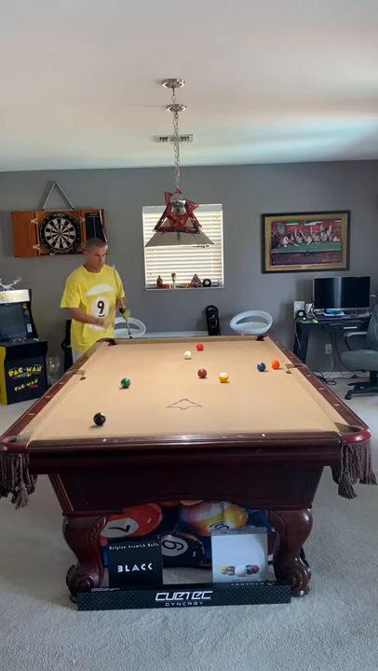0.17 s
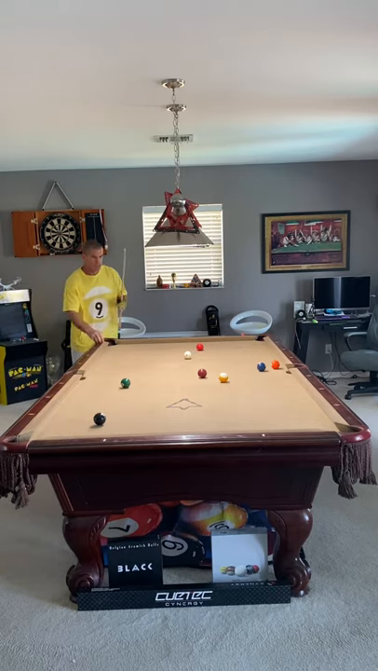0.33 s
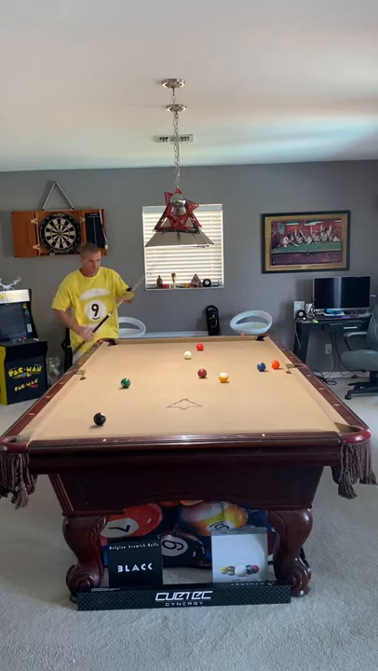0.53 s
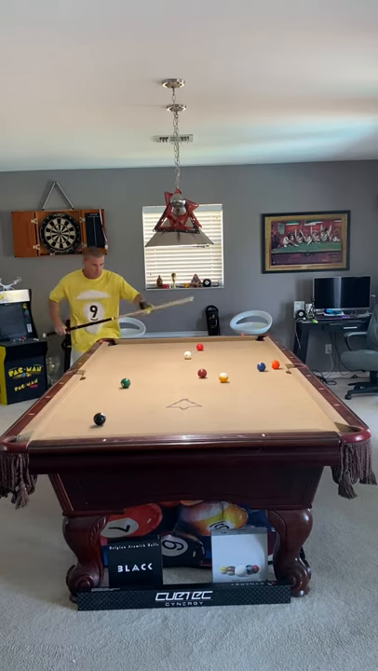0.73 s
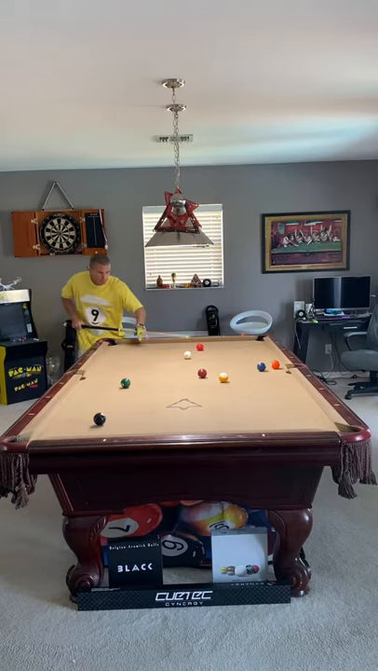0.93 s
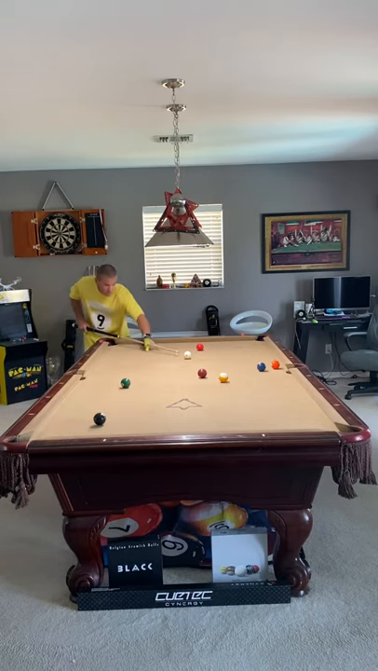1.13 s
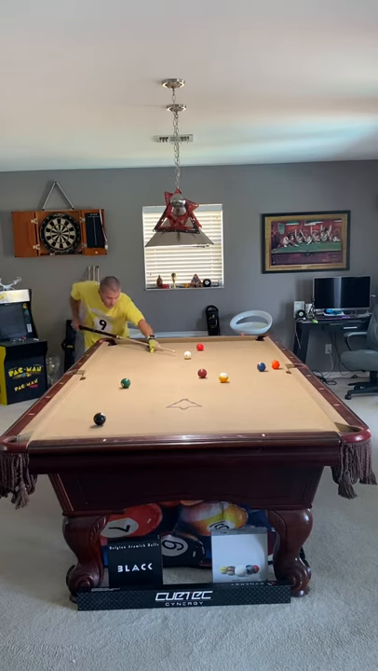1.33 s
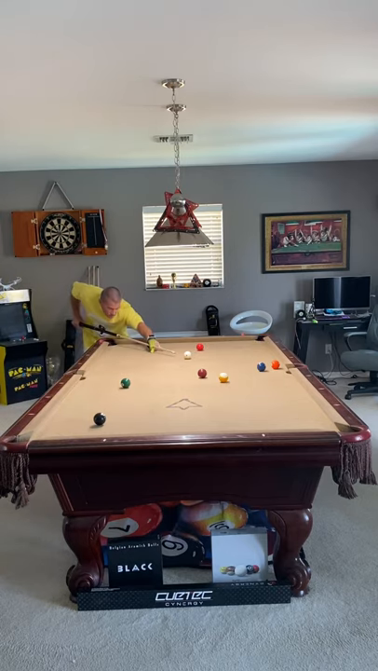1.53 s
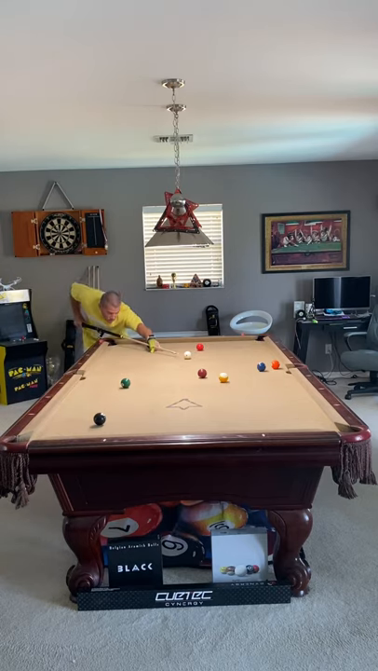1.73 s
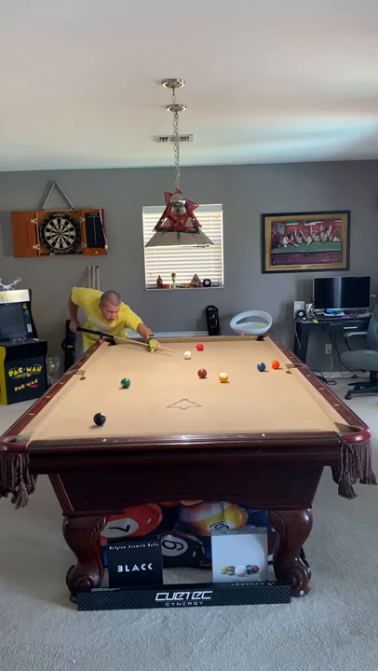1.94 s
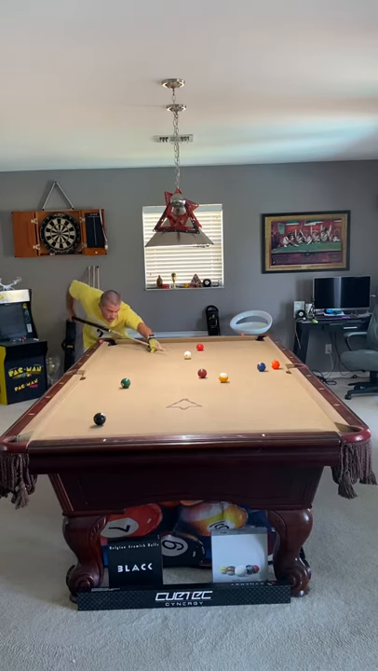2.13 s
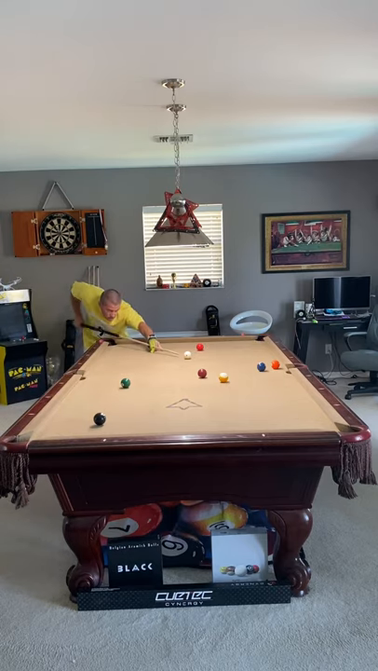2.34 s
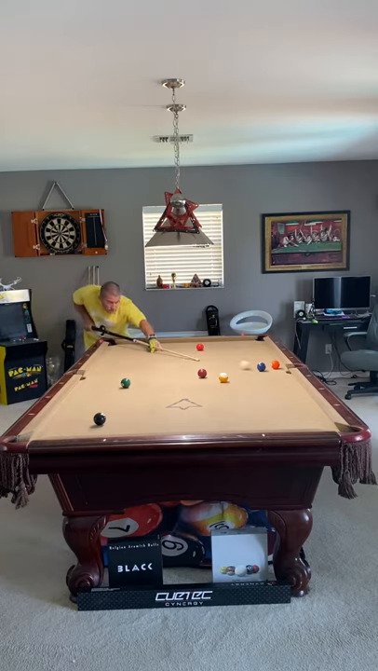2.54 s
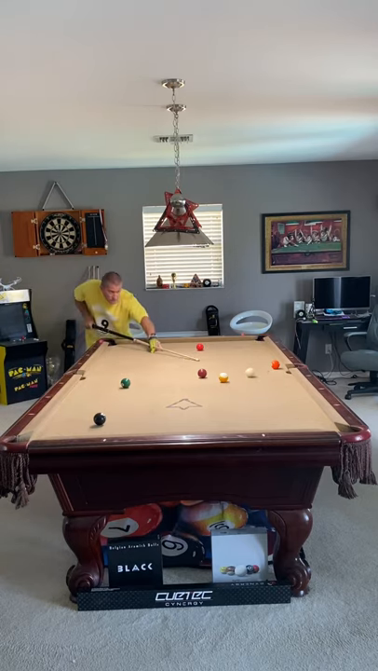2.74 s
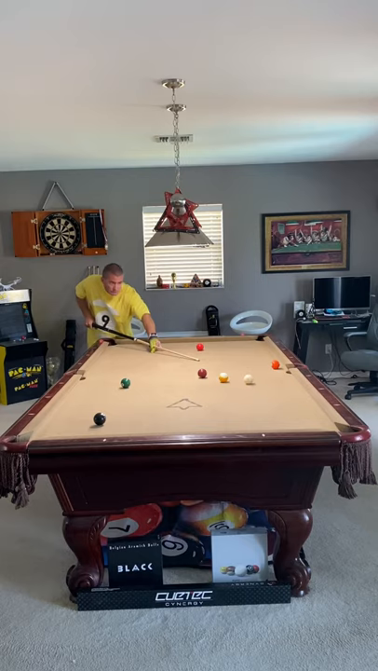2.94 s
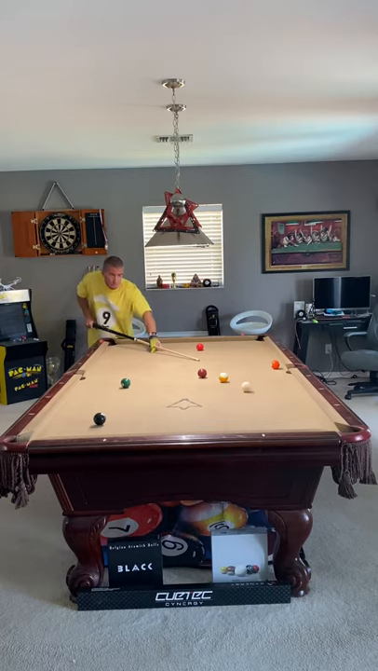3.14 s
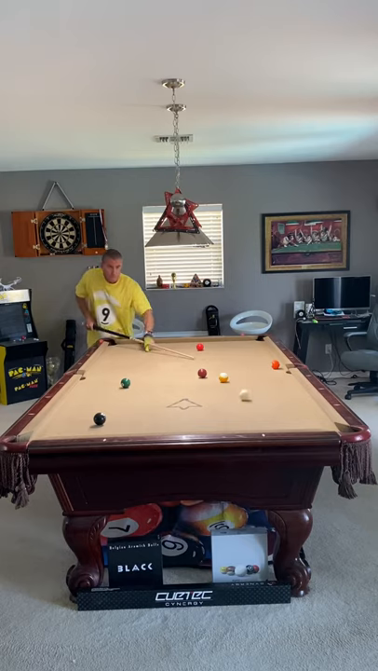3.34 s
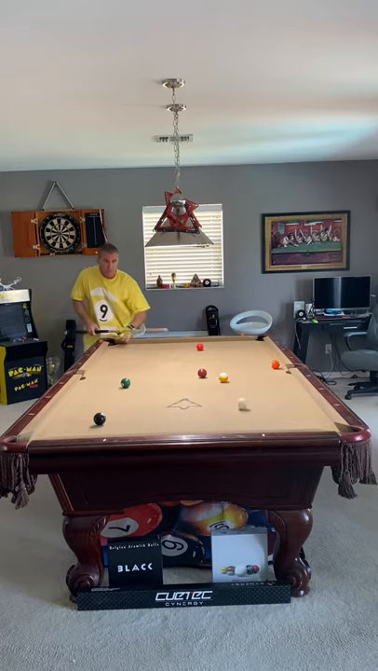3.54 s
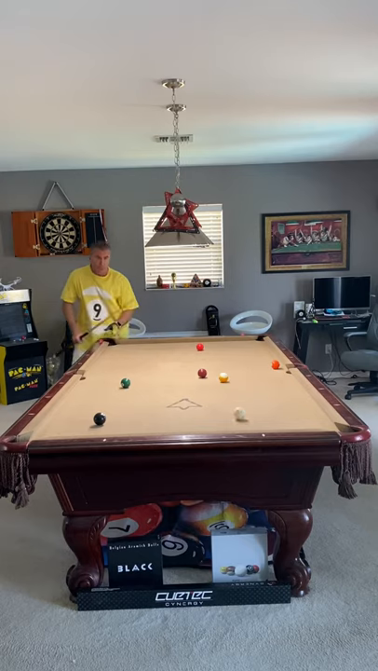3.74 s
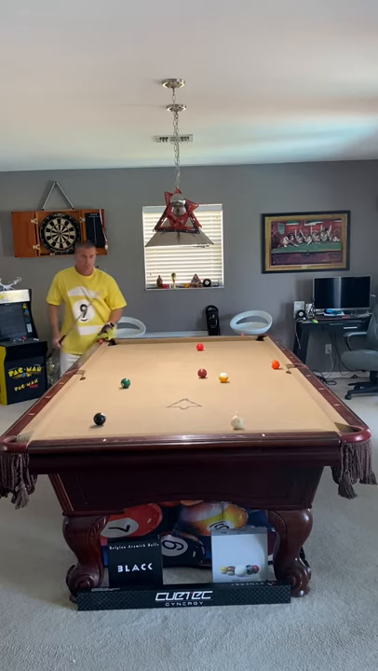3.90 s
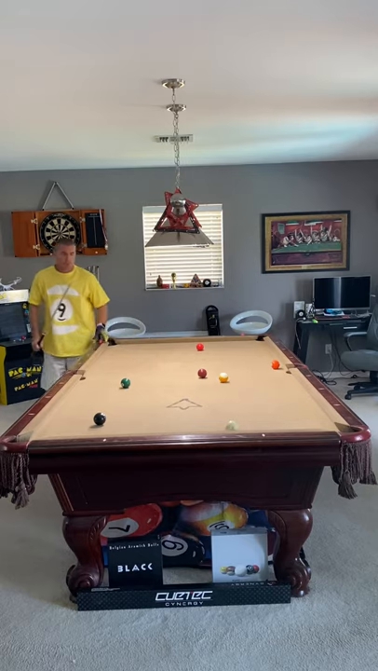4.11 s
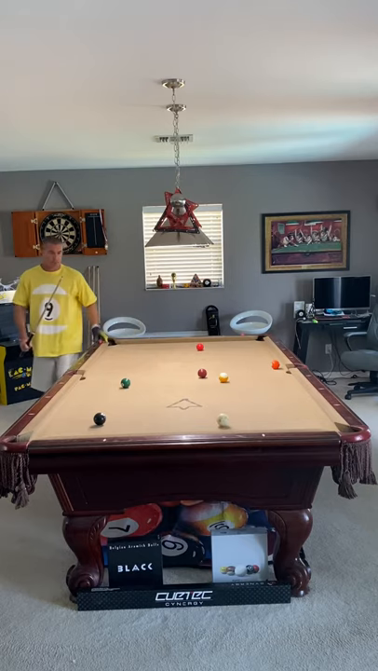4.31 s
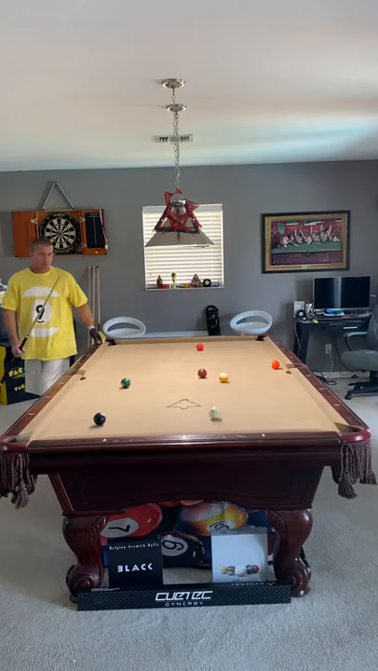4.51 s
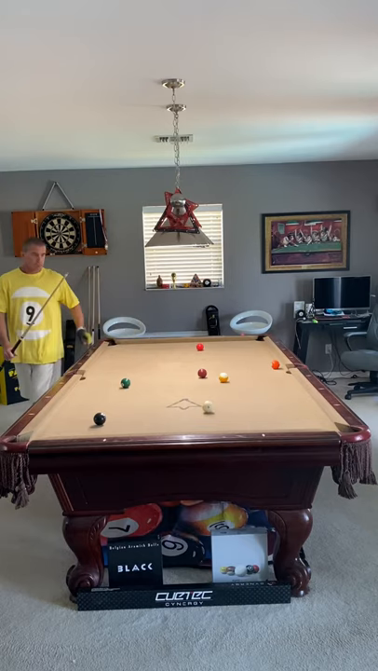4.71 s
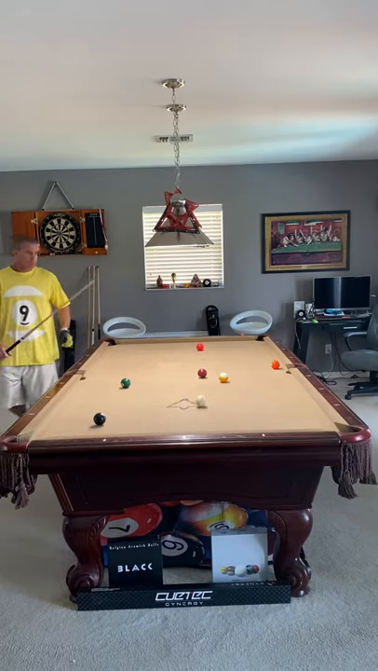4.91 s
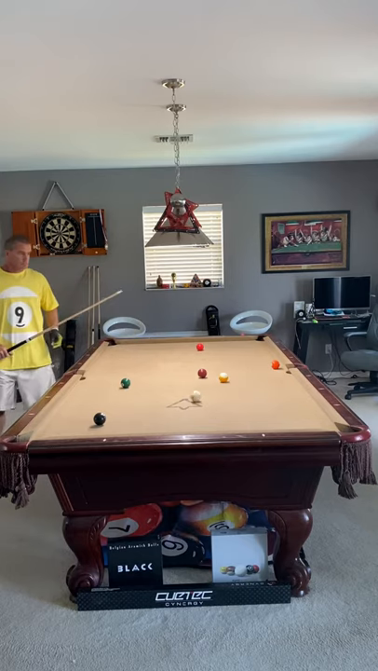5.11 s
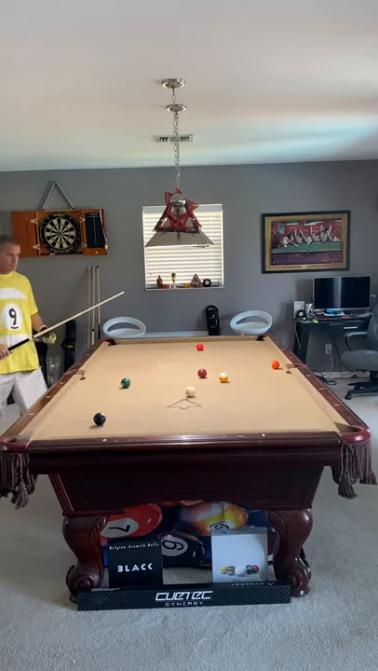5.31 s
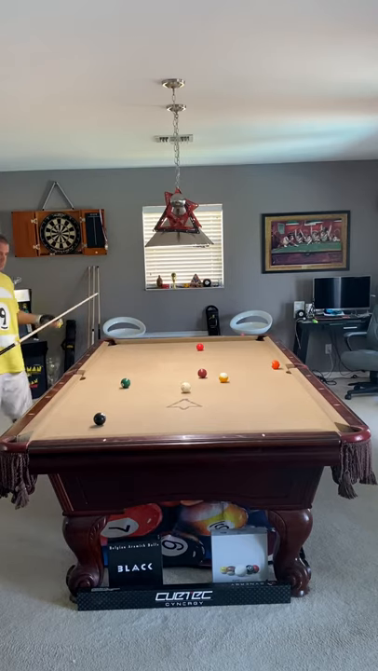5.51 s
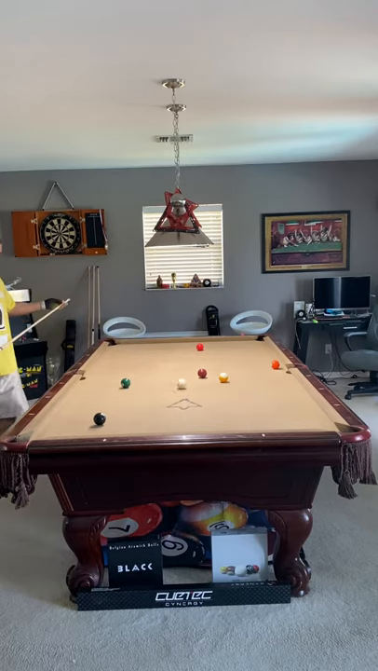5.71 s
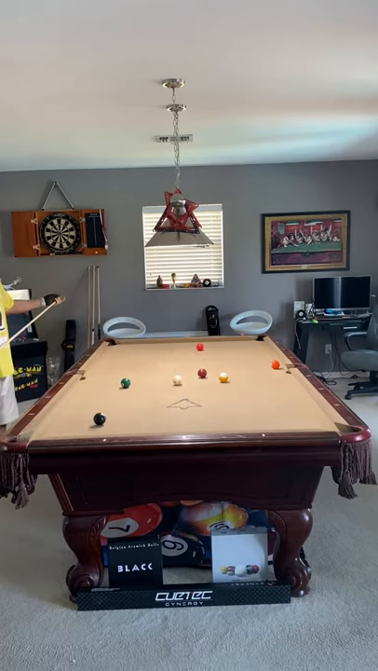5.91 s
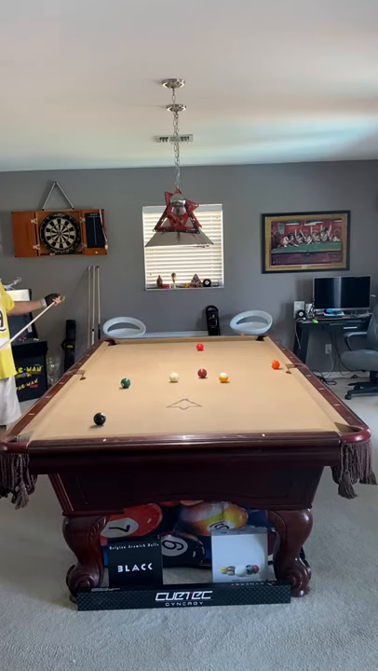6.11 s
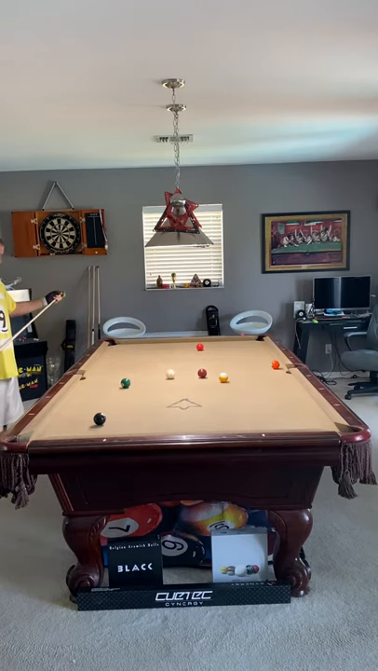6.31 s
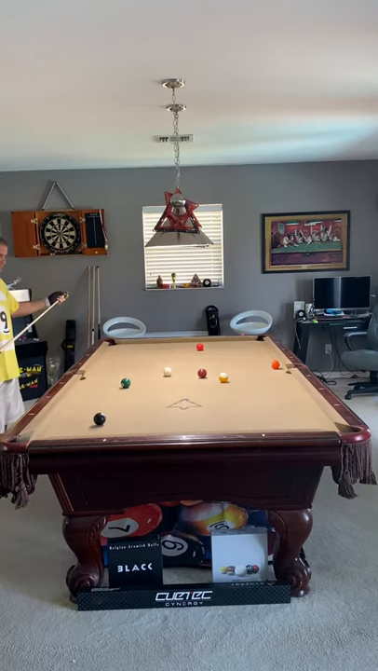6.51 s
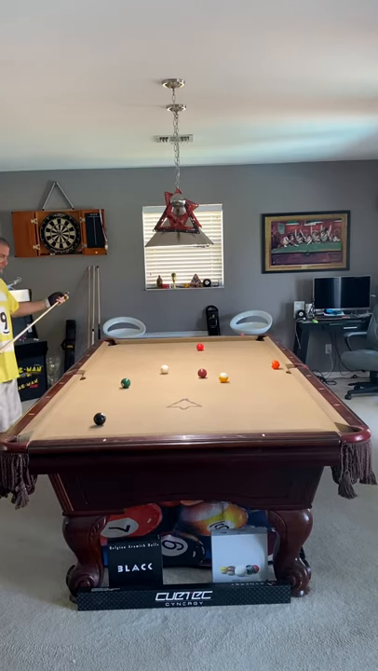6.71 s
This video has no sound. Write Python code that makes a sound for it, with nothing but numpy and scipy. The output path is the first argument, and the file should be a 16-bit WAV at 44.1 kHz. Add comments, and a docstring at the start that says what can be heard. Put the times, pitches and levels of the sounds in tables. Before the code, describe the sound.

A cue strikes a pool ball, balls clack and rattle into a pocket, then chalk faintly scrapes the tip in a quiet room.

```python
"""First comes a soft brush of clothes and a tap on the wooden rail of a pool table. Then the cue knocks
the white ball; balls clack, thump the cushions and rattle into a pocket. Last, chalk scrapes the cue tip.
Hard balls give very short clicks, while cue, rail and table ring briefly when hit. Rubbing cloth and
shifting weight make swells of noise. The carpeted room answers each blow with echoes and a half-second
tail, over a low house rumble."""
import sys
import numpy as np
from scipy import signal
from scipy.fft import rfft, irfft
from scipy.io import wavfile
from scipy.ndimage import uniform_filter1d

SR = 44100
rng = np.random.default_rng(int(sys.argv[2]) if len(sys.argv) > 2 else 0)


def generate_wav(sig):
    """Save sig (samples, or channels by samples) to the path in sys.argv[1] as 16-bit PCM at SR."""
    pcm = np.round(np.clip(np.atleast_2d(sig).T, -1, 1) * 32767).astype(np.int16)
    wavfile.write(sys.argv[1], SR, pcm)


N = 297675


# Ball on ball, small hard ticks, and a duller echo of the first clack just after it. "Edge" is the sharp snap;
# "send" is what goes out into the room. # t/s, level/dB, f/Hz, rise of the send/cycles, edge/dB, send/dB, left
# minus right/dB
BALL_CLACKS = [(2.5635, -7.5, 2350, 0.95, -18.5, -7.5, -0.5), (2.5637, -24, 4000, 1.5, -30, -6, 0),
               (2.5835, -25, 1250, 1.5, -40, -12, 0), (2.872, -18.5, 1900, 0.72, -28, -8.5, -3),
               (2.9988, -27, 1850, 0.6, -3.5, 1, 6), (3.0045, -26, 2060, 1.6, -8, -11, 0),
               (3.004, -35.5, 4530, 3.2, -31, -5.5, 10), (5.6189, -54, 4500, 1.5, -20, -8, 3),
               (5.7275, -36, 3500, 2.2, -18, -21, 2), (6.2672, -37, 2750, 0.8, -25, -13, 0.5)]
def ball_clacks():
    """Hard balls barely ring: each contact is a quick wiggle of air pressure with a sharp edge."""
    direct, send = np.zeros((2, N)), np.zeros(N)
    t = np.arange(1500) / SR
    for s, db, hz, cycles, edge_db, send_db, pan_db in BALL_CLACKS:
        edge = undb(edge_db) * crack(len(t), fade_s=0.0033, top_hz=2500)
        straight = wiggle(t, hz, rise_s=1.5 * cycles / hz, steepness=3)
        sideways = wiggle(t, 0.92 * hz, rise_s=cycles / hz, steepness=4)  # lower toward the walls
        pan = undb(np.array([[pan_db], [-pan_db]]) / 2)
        add(direct, s, undb(db) * (straight + edge) * pan)
        add(send, s, undb(db + send_db) * (sideways + edge))
    return direct, send


def wiggle(t, hz, rise_s, steepness):
    """A tiny burst of tone that peaks at rise_s and dies away."""
    age = t / rise_s
    return np.sin(2 * np.pi * hz * t) * (age * np.exp(1 - age)) ** steepness


def crack(size, fade_s, top_hz, order=1):
    """The sharp edge of a contact: one snap and a little grit after it."""
    burst = .35 * rng.standard_normal(size + 1) * np.exp(-np.arange(size + 1) / SR / fade_s)
    burst[0] = 3  # the snap
    return signal.lfilter(*signal.butter(order, top_hz, fs=SR), np.diff(burst, prepend=0)[:size])


# Knocks of the cue; more tilt favours the high notes.
# t/s, level/dB, contact time/ms, edge/dB, send/dB, tilt/(dB per octave)
CUE_HITS = [(2.3595, -24, 0.24, -9, -4, -0.5), (2.370, -23.5, 0.082, -8.5, -16.5, 3),
            (2.380, -22.5, 0.47, -11, -15, -4), (2.391, -27, 0.45, -19, -15, -1),
            (2.411, -31, 0.33, -20.5, -12, -5), (2.456, -34.5, 0.15, -19.5, -14, 1)]
# The notes a cue rings with: f/Hz, level/dB, time to fade by 60 dB/s
CUE_NOTES = [(201.2, -5.5, 0.019), (288, -8, 0.015), (390, -3.5, 0.015), (460.7, 1, 0.014),
             (650, -4.5, 0.018), (820, -3, 0.015), (973.4, -5.5, 0.017), (1360, -6, .012),
             (1626, -13.5, 0.05), (2028, -12.5, 0.015), (2350, -12, 0.03006), (2760, -15, 0.022),
             (3900, -13, 0.0062)]
def cue_strike():
    """The cue hits the white ball and rings in a quick run of knocks."""
    return blows(CUE_HITS, CUE_NOTES)


# Hand and hip lean on the table, then balls hit cushions and pocket. Columns as in CUE_HITS.
TABLE_HITS = [(.785, -52, 3.7, -58, -14.5, -1.5), (1.326, -52.5, 3.6, -60, -10.5, -3),
              (2.612, -31.5, 1.76, -40, -5.5, -0.5), (2.667, -23, 0.35, -26, -4, 3.5),
              (2.677, -29, 0.79, -40, -7.5, 1.5), (2.687, -22, 0.42, -31, -27.5, -2),
              (2.696, -33, 1.3, -37.5, -27, 1), (2.715, -32.5, 1.04, -37, -16, -1),
              (2.730, -28, 0.32, -23, -5, 7), (2.792, -30, 0.7, -39.5, -21, 4.5),
              (2.801, -26.5, 0.27, -38, -10, 11), (2.855, -35, 5.7, -36.5, -16.5, -9.5),
              (4.052, -49, 0.36, -24, -4, -3), (4.068, -46, 3.3, -48, -1, 1),
              (4.085, -32, 0.47, -35, -9.5, 1), (4.108, -31.5, 1.2, -39, -21, 1.5),
              (4.123, -40.5, 0.52, -41, -10, -1), (4.136, -33, 2, -40, -18.5, 0.5)]
# The table's notes: f/Hz, level/dB, time to fade by 60 dB/s
TABLE_NOTES = [(105, -9, 0.11), (146.4, -4.5, 0.13), (253.4, -13.5, 0.11), (352, 6.5, 0.034),
               (450, 13, 0.0044), (604, 6.5, 0.036), (724, 14, 0.0055), (895, 7, 0.011), (1170, 2, 0.0034)]
def table_thumps():
    """Mostly softer, longer pushes wake the low notes of the table."""
    return blows(TABLE_HITS, TABLE_NOTES)


# Something small is set down on the rail. Columns as in CUE_HITS.
RAIL_HITS = [(.281, -42.5, 0.18, -28, 2, 0), (.2885, -32, 0.094, -13.5, -11, 0),
             (.2965, -34.5, 0.15, -23, -12.5, -0.5), (.303, -32.5, 0.12, -32, -7.5, -0.5),
             (.307, -30.5, 0.15, -23, -18.5, -0.57)]
# The rail's notes: f/Hz, level/dB, time to fade by 60 dB/s
RAIL_NOTES = [(232, -3, 0.019), (360, -0.5, 0.051), (513, -0.5, 0.018), (608, -1.5, 0.029),
              (786, -1.5, 0.042), (1138, 0.5, 0.025), (1566, -5.5, 0.029), (1880, -4.5, 0.012),
              (2436, -3, 0.012), (3740, -0.5, 0.0014)]
def rail_tap():
    """A few light contacts ring the wooden rail, so close together that they make one tap."""
    return blows(RAIL_HITS, RAIL_NOTES)


def blows(hits, notes):
    """A push rings an object's own notes, a little differently each time; a longer push is duller."""
    direct, send = np.zeros(N), np.zeros(N)
    t = np.arange(SR // 4) / SR
    for s, db, contact_ms, edge_db, send_db, tilt_db in hits:
        scatter_db = 1.5 * rng.standard_normal(len(notes))
        detune = rng.normal(1, .008, len(notes))
        ring = 0
        for k, (hz, note_db, fade_s) in enumerate(notes):
            gain = (-1) ** k * undb(note_db + scatter_db[k] + tilt_db * np.log2(hz))
            ring += gain * np.sin(2 * np.pi * hz * detune[k] * t) * fade(t, fade_s)
        push = np.sin(np.pi * np.clip(t[:256] / (contact_ms / 1000), 0, 1))
        knock = np.convolve(ring, push / push.sum())[:len(t)]
        edge = undb(edge_db) * crack(len(t), fade_s=0.019, top_hz=4330, order=2)
        sound = undb(db) * (knock / np.abs(knock).max() + edge)
        add(direct, s, sound)
        add(send, s, sound * undb(send_db))
    return direct, send


# Where the cue's parts and the chalk cube ring (the collar holds the tip): f/Hz, width/Hz, level/dB
GRIP_BANDS = [(579, 72, 2), (764, 84, 3)]
SHAFT_BANDS = [(1260, 48, -10), (1413, 110, -3.5), (1520, 46, -3), (1876, 46, -2.5), (1550, 940, -3.5)]
TIP_BANDS = [(2518, 81, 1.5), (2700, 75, 0.5), (2310, 1240, -8)]
CUBE_BANDS = [(3140, 420, -3), (3510, 230, 1.5), (3970, 330, -3)]
COLLAR_BANDS = [(4800, 1300, 0), (5070, 3000, -9.5), (6150, 1670, -6.5)]
# Twists of the chalk: full at t/s, rise/s, hold/s, level/dB of grip, shaft, tip, cube, collar, dust
CHALK_TWISTS = [(5.62, 0.0029, 0.035, -64.5, -58.5, -66, -71, -65.5, -81),
                (5.67, 0.042, .01, -80, -75, -80, -66, -66, -93),
                (5.695, 0.015, .005, -78, -60, -66, -75, -64, -93),
                (5.745, 0.01, 0.0072, -80, -66, -55.5, -57, -60.5, -83),
                (5.785, 0.017, 0.014, -72, -67, -66, -60, -54, -73.5),
                (5.855, .01, 0.012, -78, -67.5, -71, -75, -79, -86),
                (5.9, 0.095, 0.28, -71.5, -68, -74, -80, -75.5, -106),
                (6.16, 0.033, 0.0069, -85, -71, -77, -71, -69.5, -86),
                (6.272, 0.009, 0.011, -60, -55.5, -62.5, -70, -67.5, -78),
                (6.37, 0.032, 0.039, -76, -68, -72, -66, -66, -81),
                (6.47, 0.058, 0.033, -75, -65, -65, -64, -65, -79.5),
                (6.565, 0.032, 0.04, -68.5, -59, -66, -62.5, -61.5, -74),
                (6.655, 0.015, 0.025, -61, -52.5, -60, -52, -58, -74),
                (6.74, 0.03, .03, -79, -68, -60, -66, -59, -74)]
# How fast those six layers die away: fall/(dB per s)
CHALK_FALLS = (150, 112, 131, 134, 129, 100)
def chalk():
    """Grit of uneven size catches on the tip and rings cue and cube; the ringing flickers and wanders."""
    grit = rng.standard_normal((2, N)) * undb(2.8 * rng.exponential(size=N) + 1.6 * wander(50))
    grit = signal.lfilter(*signal.butter(1, 6000, fs=SR), grit)
    *gains, dust = swells(CHALK_TWISTS, CHALK_FALLS)
    out = dust * noise(UPPER_HISS)
    for bands, gain in zip((GRIP_BANDS, SHAFT_BANDS, TIP_BANDS, CUBE_BANDS, COLLAR_BANDS), gains):
        ring = 0
        for hz, width, db in bands:
            band = signal.butter(2, [hz - width / 2, hz + width / 2], "band", fs=SR, output="sos")
            ring += undb(db + 2.2 * wander(30)) * signal.sosfilt(band, grit)
        # the grip changes as the hand turns: all bands of a part slide a little together
        place = np.cumsum(1 + .012 * wander(9)) % N
        sliding = np.array([np.interp(place, np.arange(N), channel) for channel in ring])
        out += gain * unit(sliding)
    return out


# Dull rustle, and hiss below and above 9 kHz (chalk dust shares the upper hiss): f/Hz, level/dB
DULL_RUSTLE = [(150, -31.5), (350, -6.5), (700, -0.5), (1500, -4), (2500, -14), (4000, -23.5)]
LOWER_HISS = [(1500, -1.5), (3000, -7), (5000, -5.5), (7500, -11), (9000, -34)]
UPPER_HISS = [(8000, -33.5), (10500, 19), (13000, 1), (16000, 2)]
# Clothes, hand and cue sweep over cloth: full at t/s, rise/s, hold/s, level/dB of each layer above
CLOTH_SWEEPS = [(0.0, 0.021, 0.0095, -66, -60, -79.5), (.61, 0.054, 0.086, -71.5, -69, -77.5),
                (.78, 0.21, 0.027, -66, -88, -100), (1.08, 0.037, 0.0057, -68, -71.5, -81),
                (1.22, 0.21, 0.078, -85, -67.5, -72), (1.36, 0.24, 0.07, -58.5, -69.5, -97),
                (1.89, 0.027, 0.16, -67, -78.5, -104), (2.05, 0.25, 0.024, -54.5, -71.5, -104),
                (3.28, 0.069, 0.15, -69.5, -68, -75.5), (4.05, 0.1, 0.047, -66, -78, -99),
                (4.47, 0.094, 0.016, -78.5, -74, -81), (4.57, 0.14, 0.026, -71.5, -90, -108),
                (5.11, 0.17, 0.037, -67.5, -75.5, -103)]
# How fast those three layers die away: fall/(dB per s)
CLOTH_FALLS = (85, 103.5, 173)
def cloth_brushing():
    """Dull rustle and high hiss of cloth; the hiss is shaped with fixed dips near 9 and 13 kHz."""
    layers = zip((DULL_RUSTLE, LOWER_HISS, UPPER_HISS), swells(CLOTH_SWEEPS, CLOTH_FALLS))
    return sum(noise(shape) * gain * undb(wander(41)) for shape, gain in layers)


# Weight settles on floor and table; balls roll over the slate, the stone under the cloth.
# full at t/s, rise/s, hold/s, bump level/dB, rumble level/dB
WEIGHT_SHIFTS = [(.38, 0.67, 0.02, -99, -59), (.63, 0.081, 0.0075, -72, -58.5),
                 (.77, 0.15, 0.01, -64.5, -64.5), (1.33, 0.14, 0.062, -56.5, -53.5),
                 (2.01, 0.059, 0.065, -55.5, -58.5), (5.12, 0.12, 0.069, -66, -57),
                 (5.84, 0.063, 0.22, -66.5, -64.5), (6.58, 1, 0.024, -71.5, -65)]
BALL_ROLLS = [(2.39, 0.089, 0.13, -61, -52), (2.8, 0.45, 0.018, -56, -48), (4.1, 0.15, 0.097, -64, -54.5)]
# How fast each dies away: bump fall/(dB per s), rumble fall/(dB per s)
WEIGHT_FALLS = (72.5, 34)
ROLL_FALLS = (18, 13.5)
# When nothing moves: bump level/dB, rumble level/dB
RESTING_LEVELS = (-81, -70)
def weight_and_rolling():
    """Steps, leaning and rolling balls: soft bumps over a wavering rumble that never quite stops."""
    power = swells(WEIGHT_SHIFTS, WEIGHT_FALLS) ** 2 + swells(BALL_ROLLS, ROLL_FALLS) ** 2
    bump_gain, rumble_gain = np.sqrt(power + undb(RESTING_LEVELS)[:, None] ** 2)
    bumps = noise([(90, -28.5), (130, 0), (200, -3.5), (400, -9), (600, -22)])
    bumps *= bump_gain * undb(2 * wander(12))
    rumble = noise([(30, -17), (42, -7.5), (55, 0.5), (75, -2), (100, -1.5), (140, -11.5)])
    rumble *= rumble_gain * undb(2 * wander(7.7))
    return bumps + rumble


# One downward slide: start t/s, end t/s, start f/Hz, end f/Hz, level/dB
FALLING_TONE = (0.39, .63, 1202, 556, -64.5)
def falling_tone():
    """A faint, rough tone that falls in pitch."""
    start_s, end_s, from_hz, to_hz, db = FALLING_TONE
    progress = np.clip((np.arange(N) / SR - start_s) / (end_s - start_s), 0, 1)
    phase = 2 * np.pi * np.cumsum(from_hz * (to_hz / from_hz) ** progress) / SR
    return undb(db) * np.sin(np.pi * progress) * wander(121) * np.sin(phase)


# Echoes from slate and floor, then from the nearest walls and ceiling: delay/ms, level/dB
NEAR_ECHOES = [(2.5, -6), (5.9, -8)]
WALL_ECHOES = [(17.5, -6), (21.5, -4), (24.5, -6), (33, -9)]
# The room's tail: f/Hz, time to fade by 60 dB/s, how alike left and right are (-1 to 1)
ROOM_BANDS = [(86.4, 0.15, 0.95), (191, 0.56, 0.73), (348.8, 0.47, 0.8), (753, 0.51, -0.15),
              (1420, 0.55, -0.21), (2888, 0.52, .1), (6030, 0.46, 0.3), (10200, 0.26, -0.27),
              (16500, 0.075, 1)]
def room(direct, send):
    """Sound arrives straight, then as echoes, then as a tail that dies away band by band."""
    t = np.arange(SR) / SR
    tail = 0
    for hz, fade_s, _ in ROOM_BANDS:
        band = noise([(hz / 2, -40), (hz / 1.6, 0), (hz * 1.3, 0), (hz * 2, -40)], size=SR)
        tail += band * np.sqrt(hz) * fade(t, fade_s)
    fill_s, tail_db = 0.0045, 12
    tail *= (1 - np.exp(-t / fill_s)) ** 4
    tail *= undb(tail_db) / np.sqrt(np.sum(tail ** 2) / 2)
    for k, (ms, db) in enumerate(WALL_ECHOES):
        tail[:, int(ms * SR / 1000)] += undb(db) * np.array([1, (-1) ** k])
    echoes = sum(undb(db) * np.roll(direct, int(ms * SR / 1000), axis=-1) for ms, db in NEAR_ECHOES)
    return direct + echoes + signal.fftconvolve(send[None], tail, axes=1)[:, :N]


# The background of the house: f/Hz, level/dB
HOUSE_NOISE = [(15, -31.5), (25, -15), (43, -2.5), (92, -12.5), (229, -22.5), (427, -29.5), (600, -28.5),
               (1400, -34), (11600, -51.5), (16000, -79)]
def house_rumble(level_db=-69):
    """A steady low rumble with a faint hiss on top."""
    return noise(HOUSE_NOISE) * undb(level_db)


def noise(points, size=N):
    """Stereo noise shaped by (f/Hz, level/dB) points; the room makes the bass alike left and right."""
    log_hz = np.log(np.maximum(np.fft.rfftfreq(size, 1 / SR), 1))
    point_hz, point_db = np.transpose(points)
    gain = undb(np.interp(log_hz, np.log(point_hz), point_db, left=-90, right=-90))
    room_hz, _, likeness = np.transpose(ROOM_BANDS)
    alike = np.clip(np.interp(log_hz, np.log(room_hz), likeness), -.9, 1)
    mid, side = rfft(rng.standard_normal((2, size))) * gain * np.sqrt([1 + alike, 1 - alike])
    return unit(irfft(np.array([mid + side, mid - side]), size))


def swells(events, fall_db_per_s, rise_db=23.5):
    """Loudness of each layer: every event climbs rise_db in its rise time, holds and dies away."""
    t = np.arange(N) / SR
    power = 0
    for s, rise_s, hold_s, *levels_db in events:
        up_db = rise_db * np.minimum(t - s, 0) / rise_s
        down_db = np.outer(fall_db_per_s, np.maximum(t - s - hold_s, 0))
        power += undb(np.array(levels_db)[:, None] + up_db - down_db) ** 2
    return np.sqrt(power)


def wander(rate_hz):
    """A smooth random drift, roughly between -1 and 1."""
    hold = int(SR / rate_hz)
    steps = np.repeat(rng.standard_normal(N // hold + 1), hold)
    return 1.3 * uniform_filter1d(uniform_filter1d(steps, hold), hold)[:N]


def fade(t, fade_s):
    """Drops 60 dB every fade_s seconds."""
    return np.exp(-np.log(1000) * t / fade_s)


def add(track, s, sound):
    """Mixes a sound into the track at s seconds."""
    i = int(s * SR)
    track[..., i:i + sound.shape[-1]] += sound[..., :N - i]


def undb(db):
    """Turns decibels into a gain."""
    return 10 ** (np.asarray(db) / 20)


def unit(x):
    """Scales a sound to an average power of 1."""
    return x / np.sqrt(np.mean(x ** 2))


def scene():
    """The blows echo in the room; the quiet sounds are laid on top."""
    directs, sends = zip(ball_clacks(), cue_strike(), rail_tap(), table_thumps())
    hits = room(sum(directs), sum(sends))
    return hits + cloth_brushing() + weight_and_rolling() + chalk() + falling_tone() + house_rumble()


def record(dry):
    """The microphone drops the deep bass, its opening lifts a high band, and a steep cut ends the top."""
    bass_hz, opening_hz, top_hz = 45, 15300, 16500
    thinned = signal.lfilter(*signal.butter(2, bass_hz, "high", fs=SR), dry)
    opening = signal.lfilter(*signal.iirpeak(opening_hz, Q=8, fs=SR), thinned)
    top_cut = signal.ellip(10, .2, 80, top_hz, fs=SR, output="sos")
    return signal.sosfilt(top_cut, thinned + undb(1.5) * opening)


dry = scene()
out = record(dry)
generate_wav(out)
```